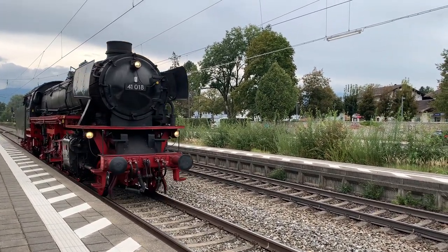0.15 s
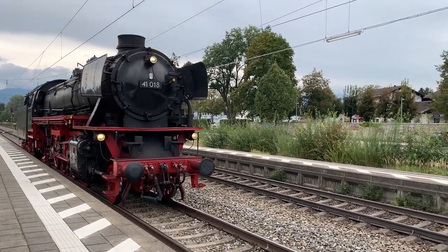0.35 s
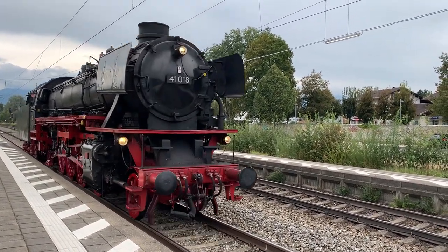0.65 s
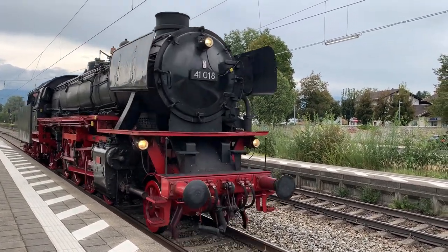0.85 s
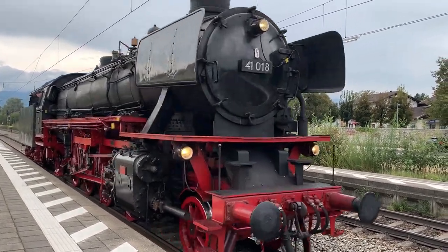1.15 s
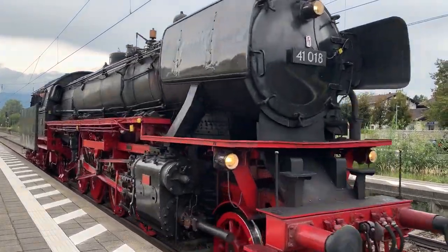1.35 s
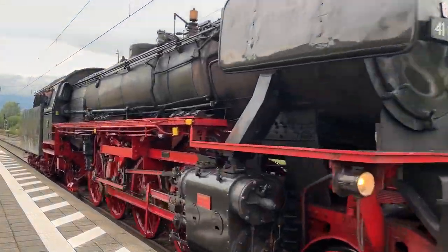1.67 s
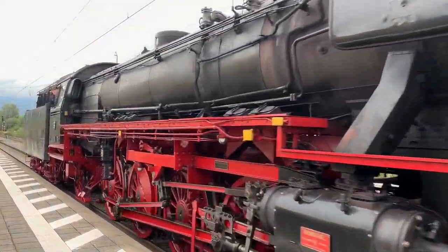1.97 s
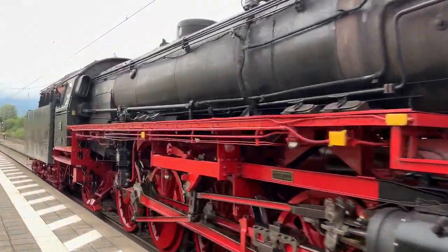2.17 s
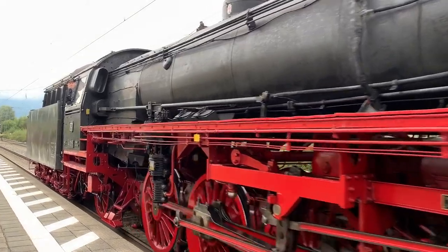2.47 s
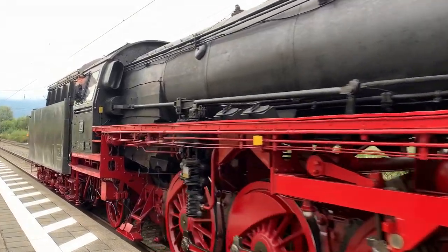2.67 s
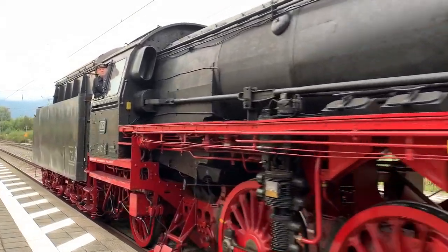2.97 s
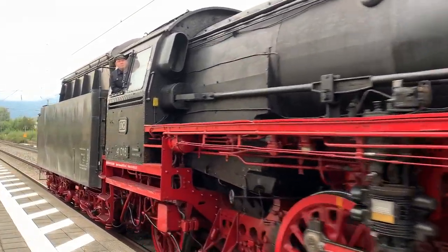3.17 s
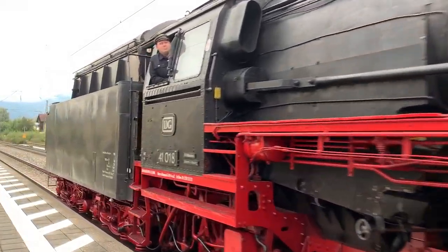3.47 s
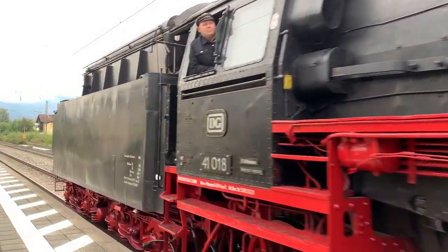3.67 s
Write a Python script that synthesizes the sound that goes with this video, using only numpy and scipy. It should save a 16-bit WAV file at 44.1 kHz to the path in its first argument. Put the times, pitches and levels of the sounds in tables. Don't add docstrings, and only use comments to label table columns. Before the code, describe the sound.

Heavy steam engine passing close outdoors: rumble and grinding wheels grow until abreast, rod knocks become sharper, a firebox drone swells then fades, and fine steam hiss runs throughout, heard from the platform in stereo.

```python
import sys
import numpy as np
from scipy import signal
from scipy.fft import rfft, irfft, next_fast_len
from scipy.io import wavfile
from scipy.ndimage import uniform_filter1d, map_coordinates

SR = 44100
rng = np.random.default_rng(int(sys.argv[2]) if len(sys.argv) > 2 else 0)


def persist_wave(psi):
    counts = np.round(np.clip(psi, -1, 1) * 32767).astype(np.int16)
    wavfile.write(sys.argv[1], SR, np.atleast_2d(counts).T)


def how_loud(loudness_db):
    steps = np.asarray(loudness_db, float) / 20
    return 10 ** steps


N = 168462

# time in seconds, rolling level in dB, grinding level in dB, open wheels in dB.
ROLLING_PASS = [(0, -36.5, 4, -30), (.35, -32.5, -1, -32), (.62, -29, 0, -23), (.7, -35, 3, -1),
                (.92, -32.5, -0.5, -0.5), (1.1, -30.5, -2, 0), (1.45, -28.5, 2, -1), (1.62, -23.5, -3, -5),
                (1.9, -25, 0.5, -3.5), (2.02, -24.5, -1, -3.5), (2.35, -27, 1.5, -4.5),
                (2.45, -25, -1, -2.5), (2.8, -26, 0.5, -1.5), (3.1, -27, 1.5, 1), (3.4, -26, 2, -3.5),
                (3.82, -28, 4, -1)]
# frequency in Hz, level in dB.
ROAR_COLOUR = [(90, -14), (190, 1.5), (320, -5.5), (450, -17), (750, -11.5), (1050, -22), (1600, -44),
               (3000, -81)]
# frequency in Hz, level in dB.
GRIND_COLOUR = [(2700, -40), (3500, -40), (3900, -9), (7000, -11)]
# frequency in Hz, level in dB.
SCRAPE_COLOUR = [(500, -36), (1000, -1.5), (1400, -2.5), (1800, -3), (2150, -3.5), (2450, -10), (2750, -40)]
# time in seconds, level in dB.
SCRAPE_LEVEL = [(0, -2.5), (.5, -5.5), (1, -2), (1.5, -4.5), (2, -4), (2.5, -0.5), (3, 0), (3.4, -2),
                (3.82, 2)]
# frequency in Hz, level in dB.
WHEEL_COLOUR = [(2000, -45), (2500, 0), (4100, -1), (5000, -37)]
# time in seconds, level in dB.
RAIL_LEVEL = [(0, -32.5), (1, -28.5), (1.9, -34.5), (2.2, -24.5), (3, -24.5), (3.3, -39), (3.82, -37.5)]
# frequency in Hz, width in Hz, level in dB.
RAIL_MODES = [(228, 9.7, 2.5), (274.7, 9.4, -4.5), (333, 37, -18.5)]
# time in seconds, level in dB.
SONG_LEVEL = [(0, -40.5), (.5, -39.5), (.75, -38), (.9, -43), (1.2, -37), (1.6, -36), (1.85, -51),
              (2.4, -39), (3.82, -43)]
# frequency in Hz, width in Hz, level in dB.
SONG_MODES = [(640, 85, 2), (803, 140, 2)]
# time in seconds, level in dB.
GROUND_LEVEL = [(0, -23), (.5, -26.5), (.9, -26), (1.15, -22.5), (1.4, -30.5), (1.9, -21.5), (2.3, -21),
                (2.7, -27), (2.93, -24), (3.1, -29.5), (3.82, -30)]
# frequency in Hz, level in dB.
GROUND_COLOUR = [(18, -60), (28, -48), (45, -22.5), (62, -1), (100, -0.5), (125, -1.5), (200, -21),
                 (400, -38)]
GRIND_DB, WHEELS_DB = -5, -8

# start in seconds, peak in dB, treble in dB, decay t60 in seconds, knock pitch in Hz.
CLANKS = [(.549, -23, -16, 0.07, 840), (1.041, -13.5, 1, 0.034, 1085), (1.13, -23, -14, 0.028, 870),
          (1.132, -19.5, -12, .02, 2080), (1.24, -17, -16, .03, 795), (1.285, -21, -12, .02, 2080),
          (1.465, -15, -16, 0.035, 760), (1.558, -19, -12, 0.025, 1890), (1.64, -15, -19, 0.041, 724),
          (1.67, -21, -12, 0.017, 2150), (2.012, -24, -14, .02, 1630), (2.0265, -9, -2, 0.045, 1746),
          (2.047, -12.5, -19, 0.028, 1765), (2.114, -17, -20, .04, 930), (2.4758, -8.5, -5.5, 0.033, 920),
          (2.545, -12, -16, 0.06, 1203), (2.9996, -2, -4, 0.039, 1894), (3.007, -11, -28, 0.025, 596),
          (3.022, -12, -13, .03, 1820), (3.3, -13.5, -21, 0.056, 1060)]
# delay in seconds, level in dB.
CONTACTS = [
    (0, 5.5),
    (.0035, -1),
    (.0085, -15),
    (0.016, -14.5),
]
# frequency as a multiple of the knock pitch, level in dB, decay t60 in seconds.
ROD_MODES = [(.5, -6, .04), (.66, -2, .06), (.8, -5, .04), (.9, -1, .07), (1.04, 0, .06), (1.3, -7, .03)]
# frequency in Hz, level in dB, decay t60 in seconds.
PIN_MODES = [(4020, 0, .055), (5170, -5, .03), (7460, 2, .04), (10500, -5, .02)]
# frequency in Hz, level in dB.
RATTLE_COLOUR = [(150, -11), (500, 6), (1800, 3), (2800, -4.5), (4000, -4), (7400, -0.5), (11000, -5),
                 (13500, -22)]
CLANK_DB, RATTLE_DB, MODE_SCATTER_DB = -15.5, 6.5, 2.5
THUD_DB, THUD_HZ = 2, 170
RISE_S = .0016

# time in seconds, level in dB.
DRONE_LEVEL = [(0, -27.5), (.3, -24.5), (.6, -33.5), (.95, -25.5), (1.1, -24), (1.24, -23.5), (1.32, -17),
               (1.55, -15), (1.9, -16), (2.3, -16), (2.4, -22.5), (2.5, -14.5), (2.8, -19), (3.1, -22.5),
               (3.35, -24), (3.45, -37), (3.82, -30)]
# frequency in Hz, width in Hz, level in dB.
FIREBOX_MODES = [(138.2, 26, -2), (161.8, 24.4, -2)]
# time in seconds, upper over lower resonance in dB.
DRAUGHT = [(0, -1), (1.2, 4.5), (1.7, 2.5), (1.95, -3.5), (2.35, -8.5), (2.5, 3), (2.75, 2), (3.1, 1),
           (3.82, -2)]
# frequency in Hz, width in Hz, level in dB.
SHUDDER_MODES = [(49, 18, 0)]
SHUDDER_DB = -7
STEADY = 0.4

# time in seconds, level in dB.
LEAK_LEVEL = [(0, -32), (.5, -31), (.9, -29.5), (1.5, -30), (2.05, -28.5), (2.6, -29), (3.05, -31.5),
              (3.43, -30), (3.82, -31)]
# frequency in Hz, level in dB.
HISS_COLOUR = [(1800, -11.5), (3100, -12.5), (5000, -11), (6500, -8.5), (8200, -1.5), (10000, -1),
               (13000, -4.5), (16000, -9.5)]
# centre in seconds, half length in seconds, level against the leak in dB.
PUFFS = [
    (.47, .03, -18),
    (1.38, 0.18, -16),
    (1.62, .03, -18),
    (2.132, .03, -17),
    (2.385, 0.019, -7),
]
HISS_DB = 5
PUFF_HZ, PUFF_WIDTH_HZ = 8950, 610

# frequency in Hz, share of the power common to both from 0 to 1.
COMMON_SHARE = [(60, .99), (200, .975), (400, .95), (800, .8), (1300, .7), (1900, .52), (2600, .15),
                (8000, .05)]
# time in seconds, left lag in ms, left over right level in dB.
BEARING = [(0, -.05, .7), (.7, -.03, .6), (1.4, .02, .4), (1.9, .09, .2), (2.5, .24, -.4), (2.9, .25, -.8),
           (3.82, .24, -.5)]
# frequency in Hz, gap in turns.
PORT_TURNS = [(1400, 0), (2500, -.4), (2850, -.49), (3600, -.51), (4300, -.68), (7000, -.82), (8620, -.5),
              (11000, 0), (13420, .5), (15800, 1.)]
# frequency in Hz, left over right level in dB.
BODY_SHADE = [(300, 0), (3650, 0), (5300, -4.5), (7200, .3), (9000, 0)]
# frequency in Hz, lag in radians.
BASS_LAG = [(60, .16), (350, .22), (800, .15), (1500, 0)]
FUSE_HZ = 6020
TOP_HZ = 15870


def rolling():
    level_db, grind_db, open_db = curves(ROLLING_PASS)
    roar = how_loud(level_db + 0.78 * wobble(5.0)) * spread(rough(ROAR_COLOUR), 2.2)

    scrape = how_loud(GRIND_DB + curves(SCRAPE_LEVEL)[0]) * spread(rough(SCRAPE_COLOUR), 2.37)
    fine = how_loud(GRIND_DB - 4.5 + grind_db) * spread(rough(GRIND_COLOUR), 1.9)
    open_wheels = how_loud(WHEELS_DB + open_db) * spread(rough(WHEEL_COLOUR), 0.81)
    grind = how_loud(level_db + 0.56 * wobble(9)) * (scrape + fine + open_wheels)

    ring = how_loud(curves(RAIL_LEVEL)[0]) * held(spread(modes(RAIL_MODES), 0.37))
    song_level = how_loud(curves(SONG_LEVEL)[0] + 3.6 * wobble(8.9))
    song = song_level * spread(lambda hz: modes(SONG_MODES)(hz) ** 2, 2.8)

    ground = how_loud(curves(GROUND_LEVEL)[0] + 0.26 * wobble(12)) * spread(rough(GROUND_COLOUR), 0.27)
    port_gap = 0.082 * ground[0] * np.array([[0], [1], [-1]])
    return roar + grind + ring + song + ground + port_gap


def rods():
    out = np.zeros((3, N + SR))
    t = np.arange(SR // 8) / SR
    rattle = unit(filtered(rng.standard_normal((3, N)), colour(RATTLE_COLOUR)))
    tick = unit(filtered(rattle, lambda hz: hz > 2600))
    for start, db, treble_db, t60, knock_hz in CLANKS:
        for delay, contact_db in CONTACTS:
            first = round((start + delay) * SR)
            at = slice(first, first + len(t))
            grit = rattle[:, at] + (how_loud(treble_db + 7.5) - 1) * 0.31 * tick[:, at]
            grit = how_loud(RATTLE_DB - 60 * t / max(t60, .01)) * grit
            rod = struck(ROD_MODES, knock_hz, t)
            pin = how_loud(treble_db + 0.5) * struck(PIN_MODES, 0.96, t)
            rise = 1 - np.exp(-t / RISE_S)
            out[:, at] += how_loud(db + contact_db + CLANK_DB) * (rod + pin + grit) * rise
        thud = how_loud(db + CLANK_DB + THUD_DB - 60 * t / 0.04) * np.sin(2 * np.pi * THUD_HZ * t)
        out[0, round(start * SR):][:len(t)] += thud

    high = lambda hz: 1 / (1 + (FUSE_HZ / (hz + 1)) ** 12)
    body = filtered(out[:, :N], lambda hz: (1 - high(hz)) * port_shares(hz))
    return body, fused(filtered(out[0, :N], high))


def struck(table, scale, t):
    total = 0
    for hz, db, t60 in table:
        level = how_loud(db + rng.normal(0, MODE_SCATTER_DB, (3, 1)) - 60 * t / t60)
        total = total + level * np.sin(2 * np.pi * (scale * hz * t + rng.random((3, 1))))
    return total


def fire():
    drone_db, = curves(DRONE_LEVEL)
    shudder_db = uniform_filter1d(drone_db, size=30000) * .5 - 20.0 + SHUDDER_DB
    shudder = unit(filtered(rng.standard_normal(N), lambda hz: modes(SHUDDER_MODES)(hz) ** 3))
    shudder = how_loud(shudder_db) * shudder * np.array([[1], [.2], [0]])

    lower, upper = (held(spread(lambda hz: modes([mode])(hz) ** 2, 0.23)) for mode in FIREBOX_MODES)
    tilt_db = curves(DRAUGHT)[0] / 2
    return how_loud(drone_db - 6.2) * (lower * how_loud(-tilt_db) + upper * how_loud(tilt_db)) + shudder


def steam():
    jet = unit(filtered(noise(0.86)[0], colour(HISS_COLOUR)))
    level = how_loud(curves(LEAK_LEVEL)[0] + HISS_DB + 0.41 * wobble(8.9) + 0.46 * wobble(35))
    t = np.arange(N) / SR
    swell = sum(how_loud(db) * np.exp(-((t - centre) / half) ** 2) for centre, half, db in PUFFS)
    puff_band = lambda hz: np.exp(-((hz - PUFF_HZ) / PUFF_WIDTH_HZ) ** 2)
    stray = unit(filtered(rng.standard_normal((2, N)), puff_band))
    return fused(level * jet) + level * swell * stray


def late(rows):
    lag_ms, pan_db = curves(BEARING)
    half = lag_ms * SR / 2000
    ports = [map_coordinates(rows[0], [np.arange(N) - side * half], mode="nearest") for side in (1, -1)]
    return (np.array(ports) + rows[1:]) * how_loud([pan_db / 2, -pan_db / 2])


def fused(x):
    turns = lambda hz: np.interp(hz, *np.transpose(PORT_TURNS))
    return filtered(x, lambda hz: np.exp(1j * np.pi * np.outer([-1, 1], turns(hz))))


def port_shares(hz):
    share = np.clip(along(COMMON_SHARE, hz), 0, 1)
    return np.sqrt([share, 1 - share, 1 - share])


def spread(response, patchy_db):
    rows = noise(patchy_db, channels=3)
    return unit(filtered(rows, lambda hz: response(hz) * port_shares(hz))) / np.sqrt(1.5)


def held(rows):
    envelope = np.abs(signal.hilbert(rows[0], next_fast_len(N))[:N])
    size = uniform_filter1d(envelope, size=300)
    return unit(rows / (size + .15 * size.mean()) ** STEADY) / np.sqrt(1.5)


def noise(patchy_db, channels=1):
    z = signal.stft(rng.standard_normal((channels, N)), nperseg=512)[2]
    field = uniform_filter1d(rng.standard_normal(z.shape[1:]), size=6, axis=0)
    field = uniform_filter1d(field, size=8, axis=1)
    return signal.istft(z * how_loud(patchy_db * unit(field)), nperseg=512)[1][:, :N]


def modes(table):
    return lambda f: sum(how_loud(db) * 1j * f * w / (c * c - f * f + 1j * f * w) for c, w, db in table)


def colour(points):
    return lambda hz: how_loud(along(points, hz))


def rough(points):
    return lambda hz: how_loud(along(points, hz)) * (hz < 7600)


def filtered(x, response):
    m = next_fast_len(N + 8192)
    return irfft(rfft(x, m) * response(np.fft.rfftfreq(m, 1 / SR)), m)[..., :N]


def along(points, hz):
    f, v = np.transpose(points)
    return np.interp(np.log(hz + 1), np.log(f + 1), v)


def curves(rows):
    s, *columns = np.transpose(rows)
    return [np.interp(np.arange(N) / SR, s, column) for column in columns]


def wobble(rate):
    return map_coordinates(rng.standard_normal(400), [np.arange(N) * rate / SR])


def unit(x):
    return x / np.sqrt(np.mean(x ** 2) + 1e-20)


def scene():
    body, ticks = rods()
    return late(rolling() + fire() + body) + steam() + ticks


def band_limit(x):
    return signal.sosfilt(signal.butter(12, 17100, fs=SR, output="sos"), x)


def record(dry):
    x = dry / (1 + np.abs(dry / 1.1) ** 4) ** .25

    def ports(hz):
        shade = how_loud(np.outer([.5, -.5], along(BODY_SHADE, hz)))
        lag = np.exp(np.outer([-.5j, .5j], along(BASS_LAG, hz)))
        return shade * lag * (hz < TOP_HZ)

    mix = filtered(x, ports)
    return band_limit(mix)


dry = scene()
out = record(dry)
persist_wave(out)
```